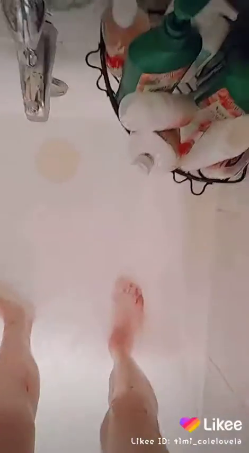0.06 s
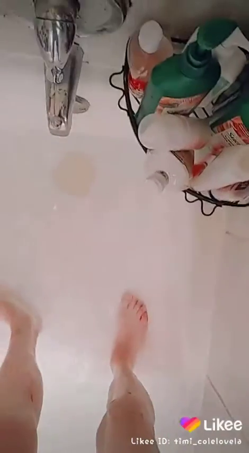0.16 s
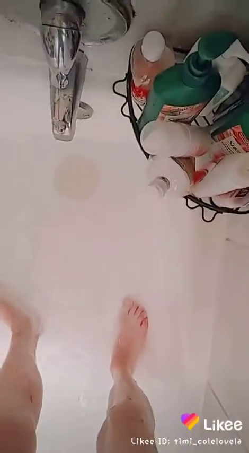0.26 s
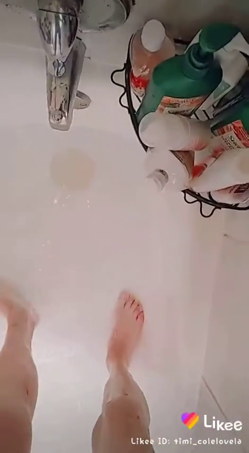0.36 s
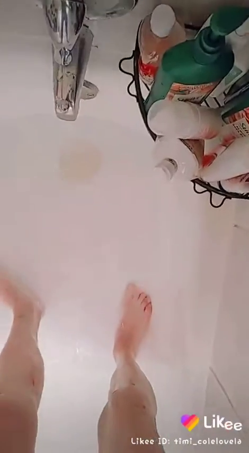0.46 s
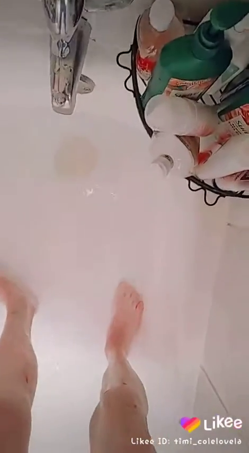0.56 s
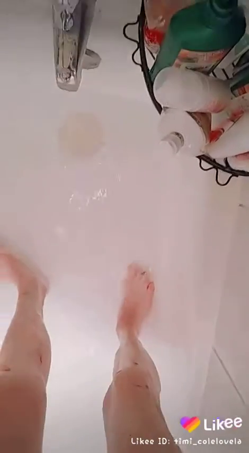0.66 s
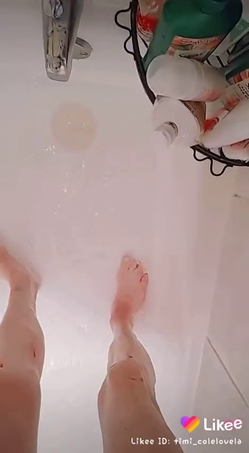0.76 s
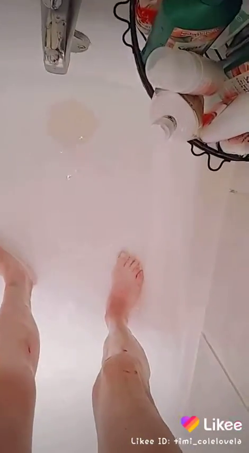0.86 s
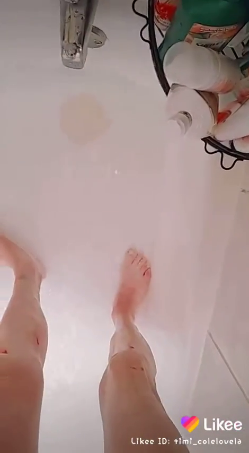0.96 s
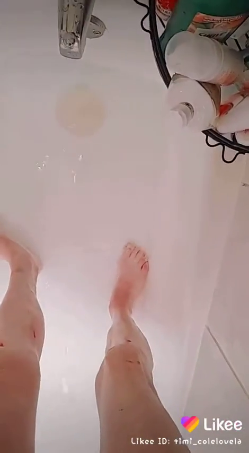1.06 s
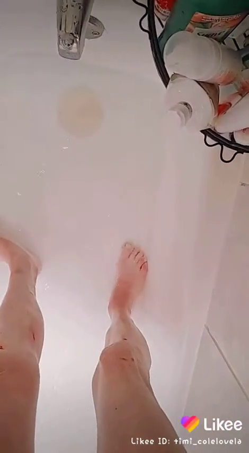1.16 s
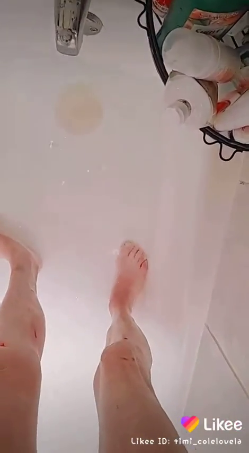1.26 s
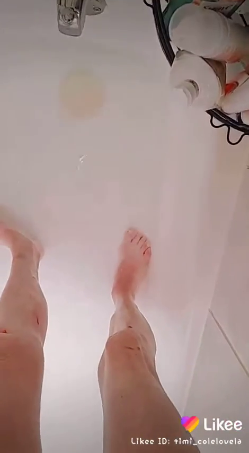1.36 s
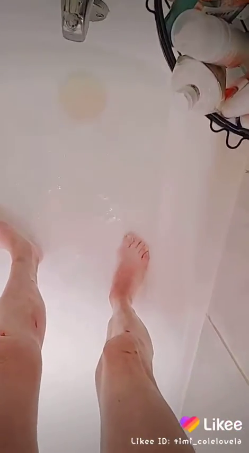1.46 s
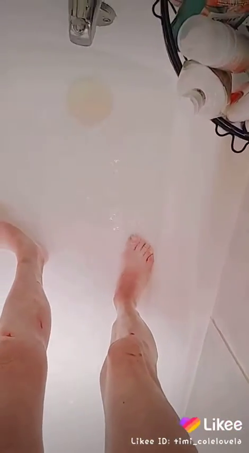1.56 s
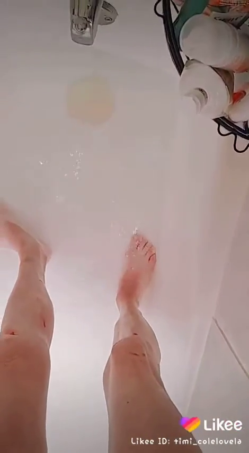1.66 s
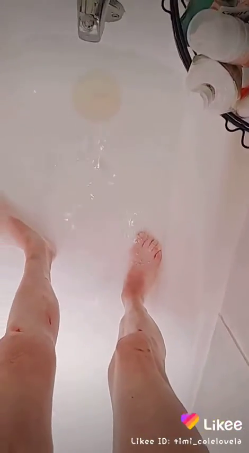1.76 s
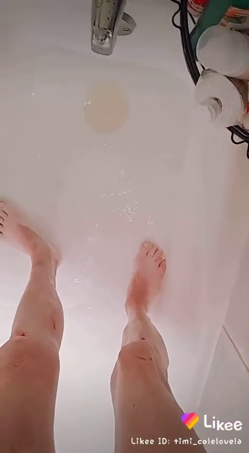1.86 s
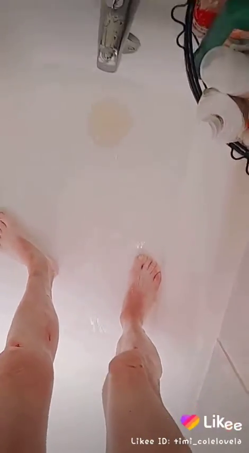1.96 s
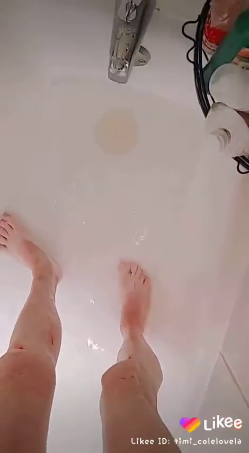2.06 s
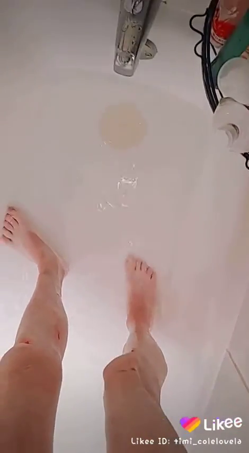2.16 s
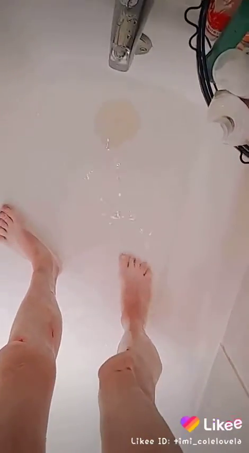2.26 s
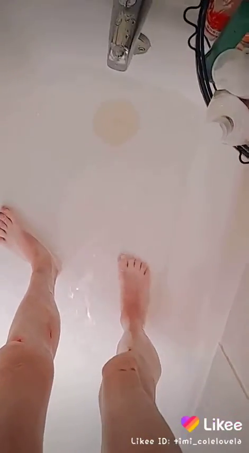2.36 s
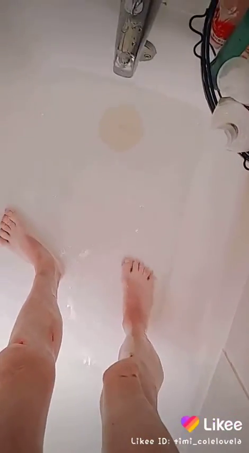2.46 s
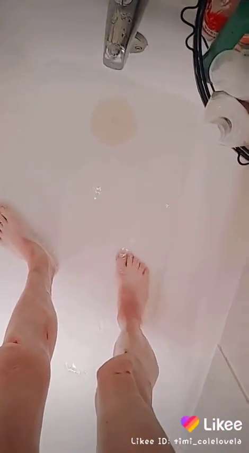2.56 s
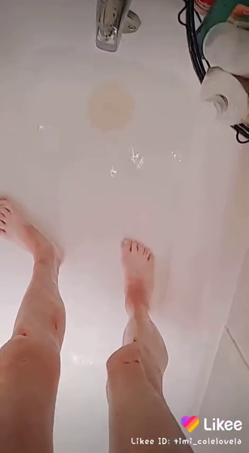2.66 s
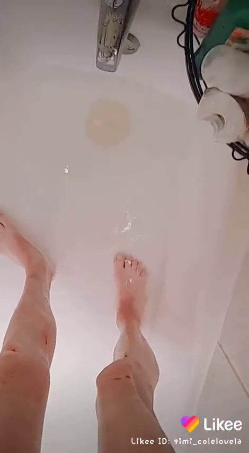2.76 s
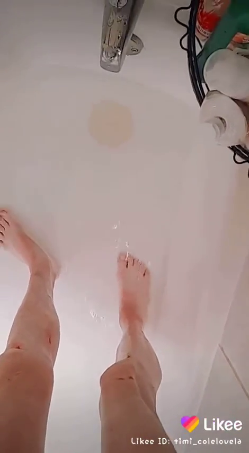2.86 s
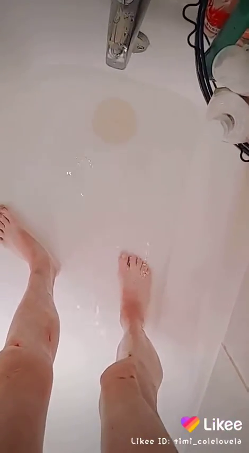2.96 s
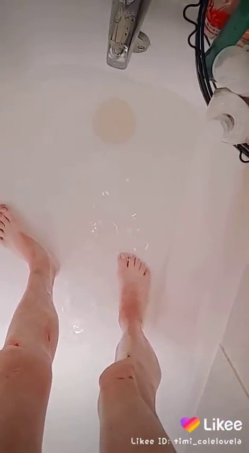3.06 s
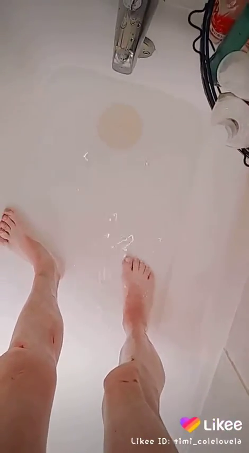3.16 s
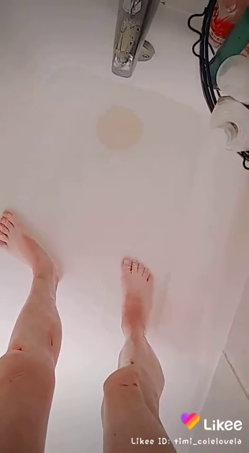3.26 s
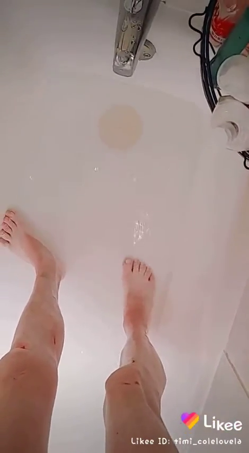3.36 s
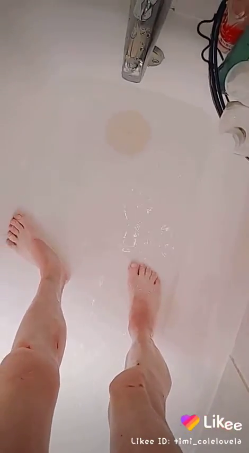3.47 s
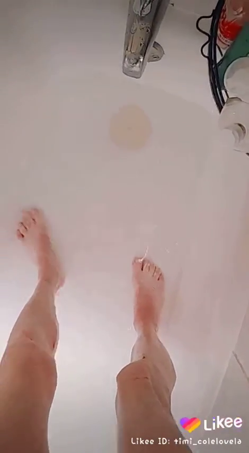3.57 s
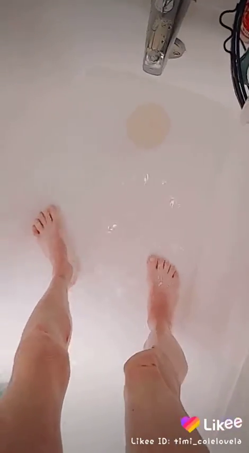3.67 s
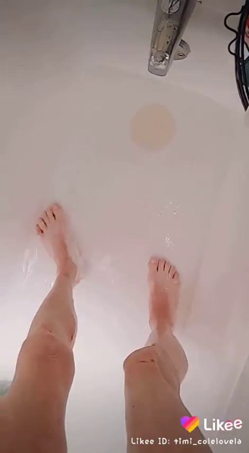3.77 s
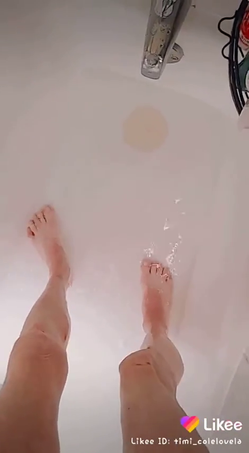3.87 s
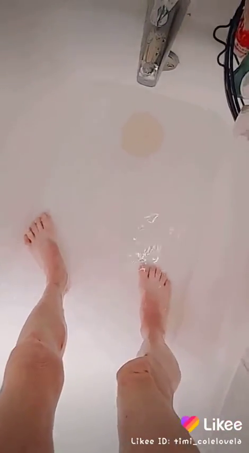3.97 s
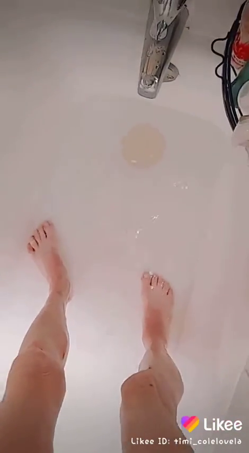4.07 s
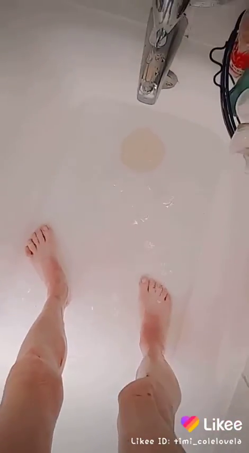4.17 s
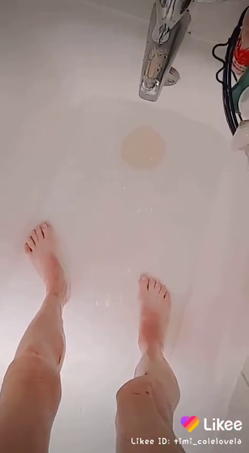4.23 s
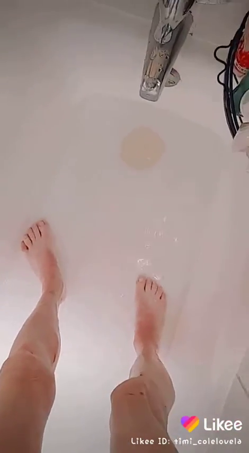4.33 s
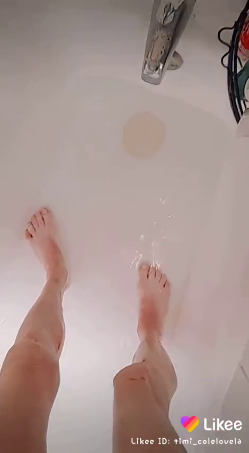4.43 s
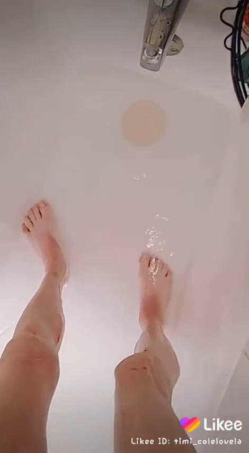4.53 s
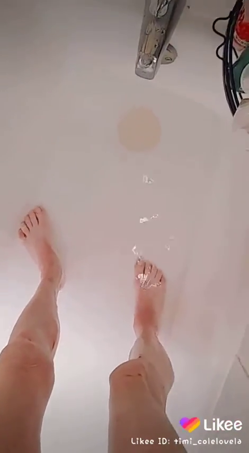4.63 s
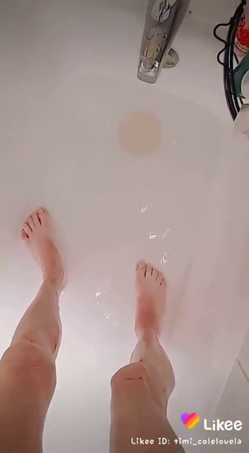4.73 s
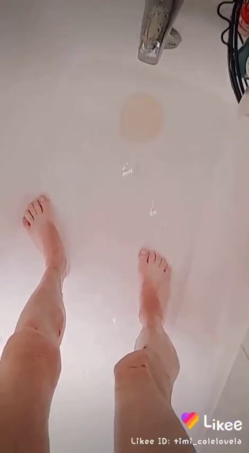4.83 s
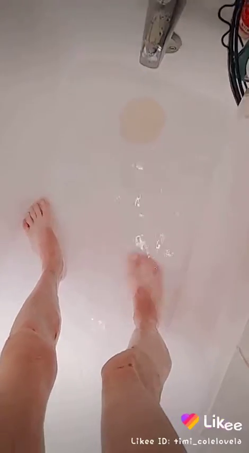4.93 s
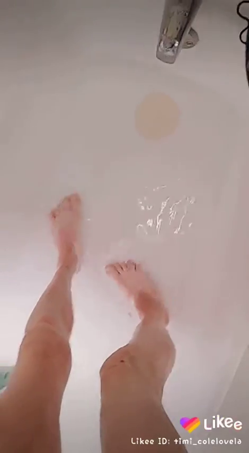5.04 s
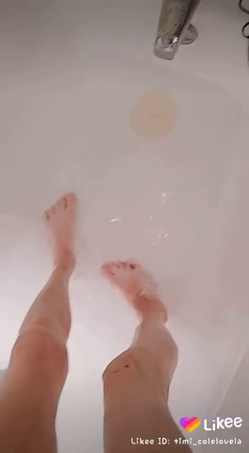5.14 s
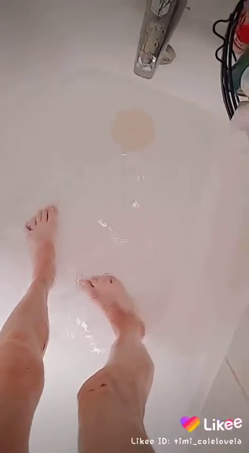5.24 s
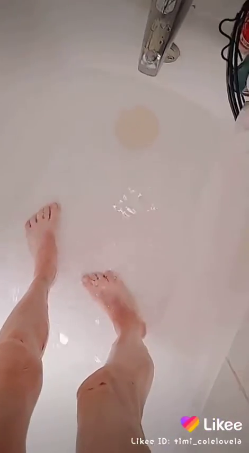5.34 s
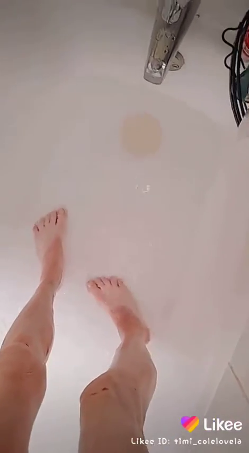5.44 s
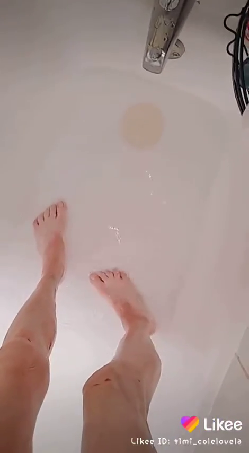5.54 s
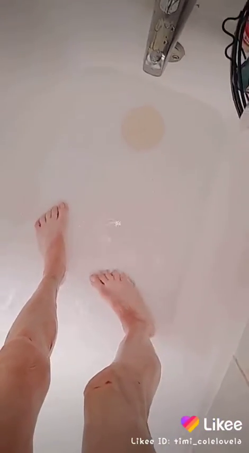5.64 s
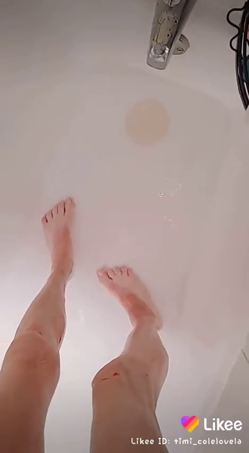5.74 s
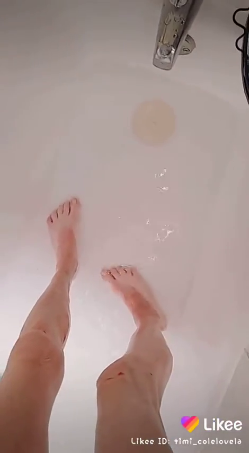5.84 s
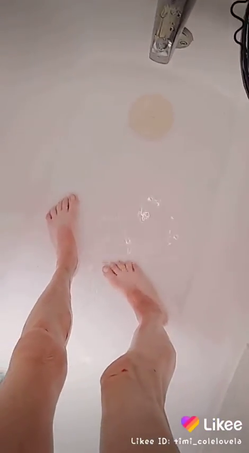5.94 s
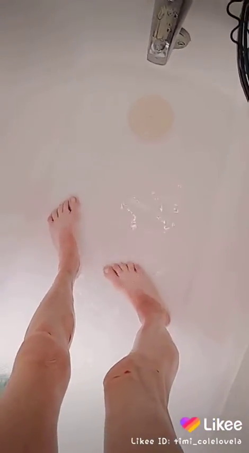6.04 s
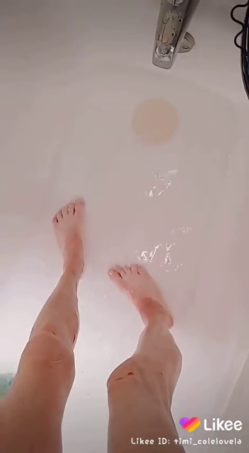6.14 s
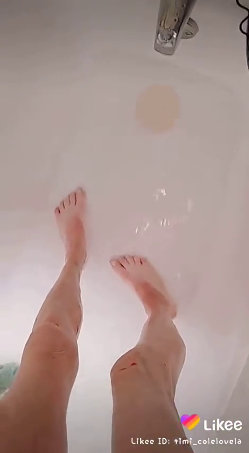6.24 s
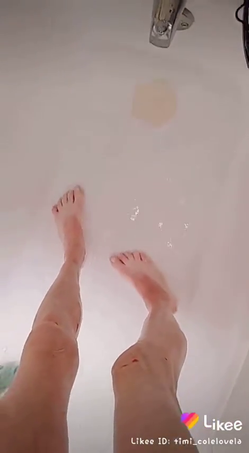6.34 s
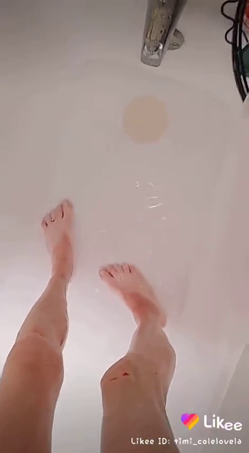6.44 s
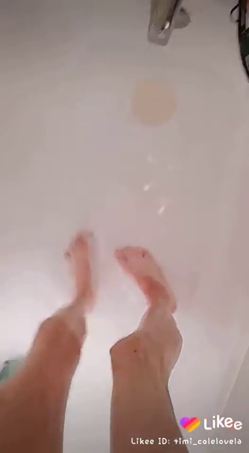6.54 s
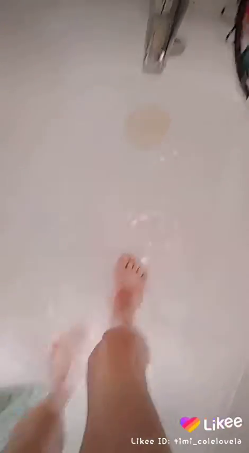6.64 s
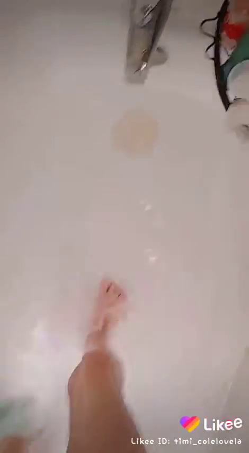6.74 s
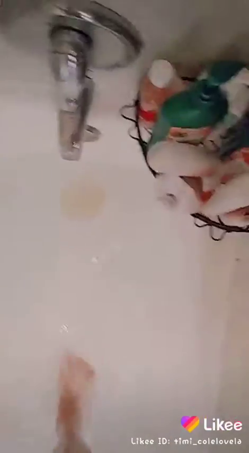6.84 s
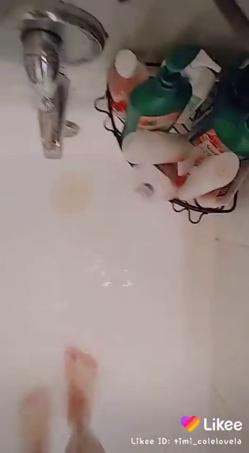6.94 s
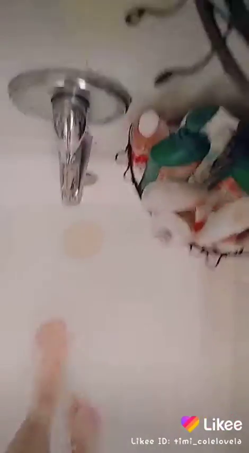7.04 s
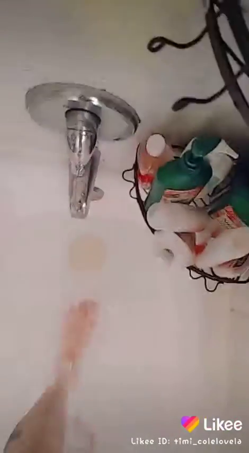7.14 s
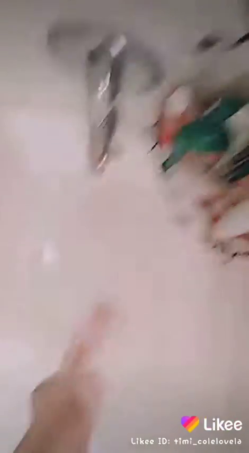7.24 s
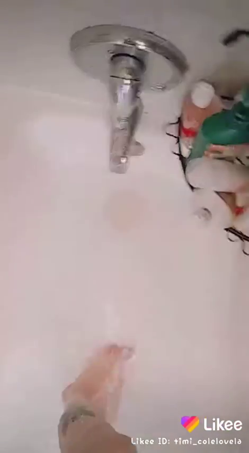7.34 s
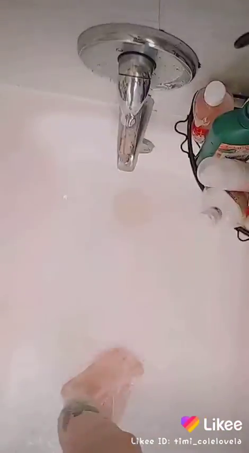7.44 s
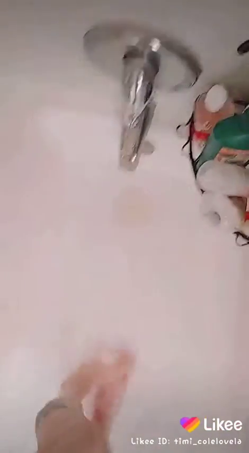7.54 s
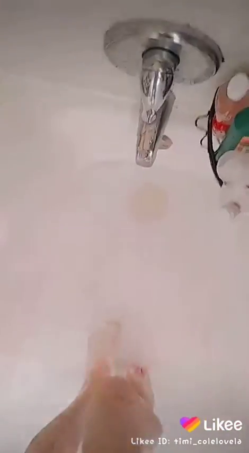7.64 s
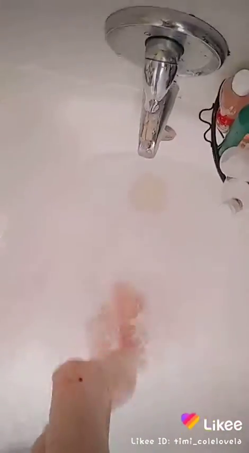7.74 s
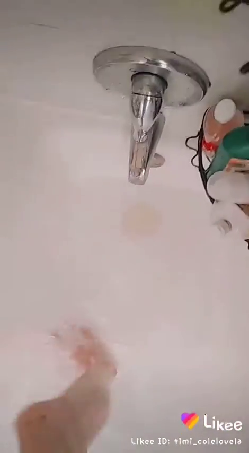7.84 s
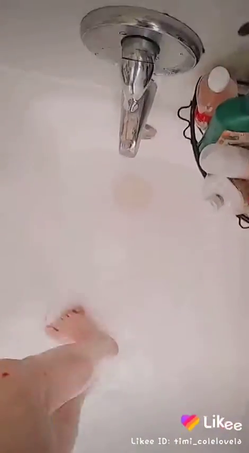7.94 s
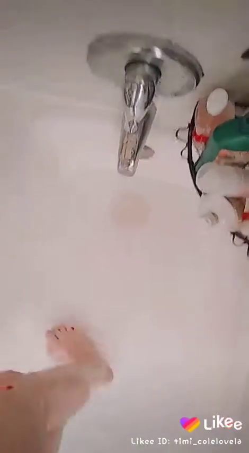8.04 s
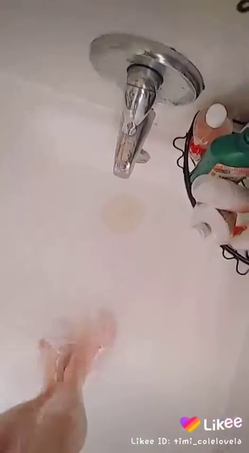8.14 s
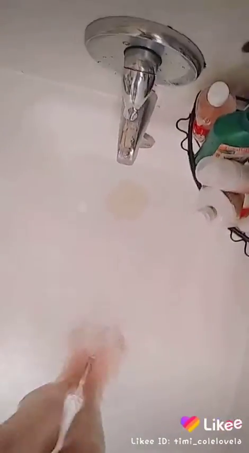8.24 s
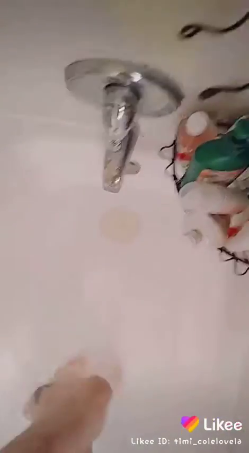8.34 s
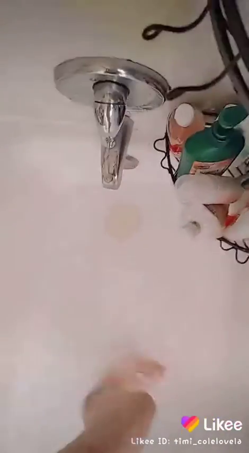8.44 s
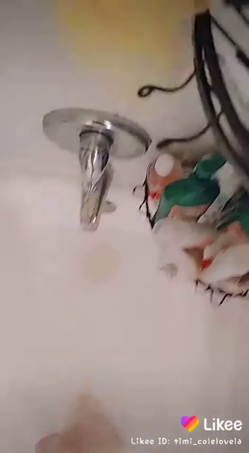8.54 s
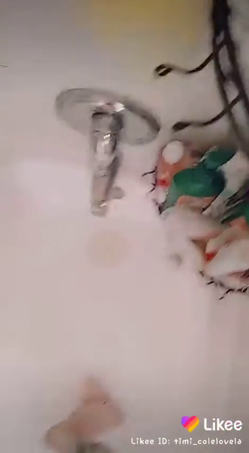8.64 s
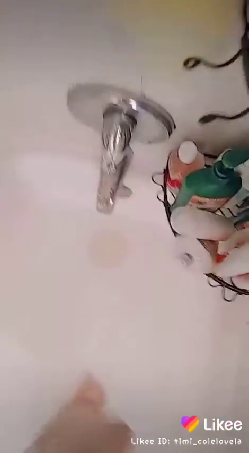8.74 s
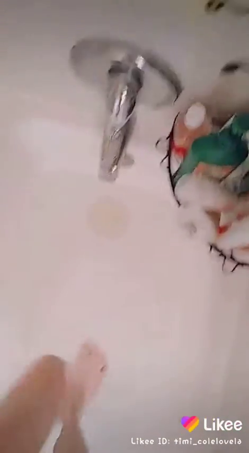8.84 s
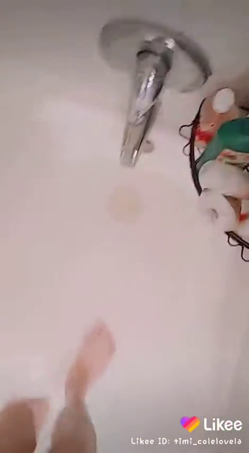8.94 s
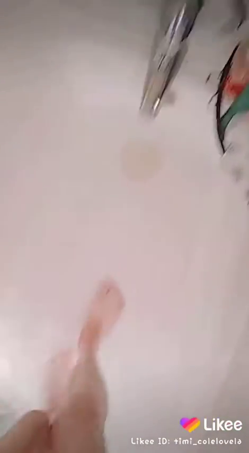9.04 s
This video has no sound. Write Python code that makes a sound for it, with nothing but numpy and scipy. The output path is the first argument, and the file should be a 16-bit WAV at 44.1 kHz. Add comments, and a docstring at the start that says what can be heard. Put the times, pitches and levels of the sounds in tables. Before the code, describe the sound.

A handheld microphone close above a bathtub catches shallow water disturbed by feet. Isolated splashes, bubbly plips and tiny ticks alternate with near silence over a faint room hum. One brisk kick stands out before the last third bursts into fast, loud stamping, with churning water, bright spray and hollow tub booms, short reflections from tiled walls, then a brief lull and a last splash.

```python
"""Bare feet splashing in a bathtub

Bare feet slosh and stamp in the shallow water of a bathtub, in a small tiled bathroom.
Moving water traps clouds of ringing bubbles and throws fizzing spray over a low surge of noise.
Heels make the tub shell boom in its modes; single drips and bubbles ring out in the quiet gaps.
Foam fizzes away, droplets rain back, sparse reflections echo the water, and a faint room tone stays."""
import sys
import numpy as np
from scipy import signal
from scipy.fft import rfft, irfft
from scipy.io import wavfile
from scipy.ndimage import uniform_filter1d

SR = 44100
rng = np.random.default_rng(int(sys.argv[2]) if len(sys.argv) > 2 else 0)


def dump(signal):
    """Clip the signal to [-1, 1] and save it as 16-bit WAV at the path in sys.argv[1]."""
    limited = np.clip(np.atleast_2d(signal).T, -1, 1)
    pcm = np.round(limited * 32767).astype(np.int16)
    wavfile.write(sys.argv[1], SR, pcm)


N = 401310  # length in samples


def gain_of(db):
    """Turns decibels into an amplitude factor."""
    return 10 ** (np.asarray(db) / 20)


def evened(x):
    """Scales a sound to an rms of 1."""
    return x / np.sqrt(np.mean(x ** 2) + 1e-20)


def read(points, hz):
    """Reads a curve drawn through (frequency, value) points, on a logarithmic frequency axis."""
    point_hz, value = np.transpose(points)
    return np.interp(np.log(hz + 1), np.log(point_hz + 1), value)


def add(mix, start_s, sound):
    """Lays a sound into the mix at a given time, cut off at the end of the mix."""
    part = mix[round(start_s * SR):][:len(sound)]
    part += sound[:len(part)]


def coloured(x, spectrum):
    """Flattens the broad spectrum of a sound, then gives it the wanted one, at rms 1."""
    z = rfft(x)
    smooth = np.sqrt(uniform_filter1d(abs(z) ** 2, size=1500))
    wanted = gain_of(read(spectrum, np.fft.rfftfreq(N, 1 / SR)))
    return evened(irfft(z / smooth * wanted, N))


def resonate(x, hz, width_hz):
    """A moving resonance: shifts the pitch curve down to zero, smooths, and shifts back."""
    turn = np.exp(2j * np.pi * np.cumsum(hz) / SR)
    r = np.exp(-np.pi * width_hz / SR)
    smooth = signal.lfilter([1 - r], [1, -r], x / turn)
    return 2 * (turn * smooth).real


def bubble(hz, rise, t60, attack_s):
    """A pocket of air rings as a dying sine whose pitch climbs as it nears the surface."""
    t = np.arange(round(np.clip(t60, .002, .4) * SR) + 8) / SR
    pitch_hz = np.minimum(hz * 2 ** (rise * t), .45 * SR)  # rise is in octaves per second
    turns = np.cumsum(pitch_hz) / SR
    return np.sin(2 * np.pi * turns) * gain_of(-60 * t / t60) * (1 - np.exp(-t / attack_s))


def cloud(low_hz, high_hz, per_s, cycles, spread_db, climb, count=16):
    """Bubbles of many sizes burst at random; each rings for some cycles, a few are large."""
    out = np.zeros(N)
    bursts = rng.random(N) < per_s / SR
    size = gain_of(spread_db * np.minimum(rng.exponential(1, N), 5)) * bursts
    kind = rng.integers(0, count, N)
    for k, hz in enumerate(np.geomspace(low_hz, high_hz, count)):
        t60 = cycles / hz
        ring = bubble(hz, climb / t60, t60, 2.6 / hz)  # climbs by this many octaves within t60
        out += signal.oaconvolve(size * (kind == k), ring)[:N]
    return evened(out)


def room_tone():
    """The quiet bathroom: steady noise with a fixed spectrum."""
    # spectrum of the quiet room: (pitch_hz [Hz], relative_level_db [dB per Hz])
    room_spectrum = [(15, -76), (25, -47), (59, -9), (80, -3.5), (91, -22), (130, 0.5), (144, -36.5),
                     (174, -2.5), (307, -33.5), (371, -19), (587, -27), (729, -20), (2030, -38),
                     (11400, -46), (15800, -59.5)]
    return gain_of(-66) * coloured(rng.standard_normal(N), room_spectrum)


def foam():
    """Foam of an earlier splash: tiny bubbles pop in a bright fizz that dies away."""
    start_db, fall_db_per_s = -52.5, 17.5
    # spectrum of the fizz: (pitch_hz [Hz], relative_level_db [dB per Hz])
    foam_spectrum = [(1470, -30), (2500, -1.5), (3300, -8), (3560, 0.5), (5490, -5.5), (6210, -3),
                     (11500, -5.5), (15800, -19.5)]
    pops = cloud(3200, 15000, 1500, 12, 2.0, 0.3, count=8) + rng.standard_normal(N)
    fizz = coloured(pops, [(1500, -60.5)] + foam_spectrum)  # almost nothing below 1500 Hz
    return gain_of(start_db - fall_db_per_s * np.arange(N) / SR) * fizz


def shower(count=40):
    """Droplets of random size rain back after a kick, each a short plip of rising pitch."""
    low_hz, high_hz, cycles, fall_db = 1090, 6000, 78, 3
    # showers of droplets: (start_s [s], length_s [s], reference_db [dB]);
    # single droplets are set 7 to 24 dB below the reference
    showers = [(0.02, 0.42, -55), (5.06, 0.27, -44.5)]
    out = np.zeros(N)
    for start_s, length_s, reference_db in showers:
        for when, pitch, size, glide in rng.random((count, 4)):
            hz = low_hz * (high_hz / low_hz) ** pitch
            t60 = cycles / hz
            plip = bubble(hz, 0.4 * glide / t60, t60, 1.7 / hz)
            level_db = reference_db - fall_db * when + 14 * (size - 1.5)
            add(out, start_s + when * length_s, gain_of(level_db) * plip)
    return out


def drips():
    """Single bubbles ring as dying sines; landing drops tick as short bursts of resonant noise."""
    # single bubbles: (start_s [s], peak_db [dB], pitch_hz [Hz], rise [octaves per s],
    # t60_s, the time to die by 60 dB [s])
    bubbles = [(0.028, -19, 444.5, 7.3, 0.12), (0.13, -20.5, 812, 0.26, 0.052), (0.2, -52, 790, 0.48, 0.08),
               (0.276, -38.5, 1080, 2.7, 0.0097), (0.311, -43, 910, 0.2, 0.033),
               (0.423, -51, 2903.0, 0.3, 0.024), (0.431, -45, 1805, 0.2, 0.024),
               (0.544, -35, 986, 0.18, 0.065), (0.581, -48, 1930, 3.4, 0.016),
               (0.755, -29.5, 3750, 0.15, 0.049), (0.758, -34, 3970, 0.57, 0.064),
               (0.769, -36.5, 4010, 0.16, 0.08), (0.852, -47.5, 1466, 3.6, 0.084),
               (0.856, -51, 2250, 0.3, 0.04), (0.892, -24.5, 1360, 5.5, 0.0072),
               (0.892, -43, 2150, 0.2, 0.025), (0.894, -26, 1024, 2.1, 0.051),
               (0.992, -55, 490, 0.5, 0.065), (1.02, -57, 1127, 0.3, 0.12), (1.081, -51, 375, 2.1, 0.11),
               (1.116, -52, 378, 1.0, 0.15), (1.158, -57, 392, 0.2, 0.16), (1.186, -46, 1653, 0.3, 0.076),
               (1.197, -45, 1710, 0.3, 0.074), (1.249, -51.5, 1390, 0.27, 0.15),
               (1.282, -48.5, 1333, 0.15, 0.085), (1.318, -60, 1378, 0.23, 0.13),
               (1.513, -50, 1714, 0.62, 0.054), (1.998, -55, 1790, 0.18, 0.13),
               (2.052, -33.5, 427, 3.7, 0.096), (2.076, -45, 1810, 0.2, 0.046),
               (2.084, -32, 1117.0, 1.3, 0.061), (2.118, -31.5, 281, 0.2, 0.081),
               (2.122, -28, 530, 4.9, 0.091), (2.131, -42, 4550, 0.3, 0.027), (2.142, -47, 4870, 0.5, 0.01),
               (2.311, -54.5, 474, 1.8, 0.11), (2.76, -59.5, 289, 1.1, 0.1), (2.83, -65, 330, 1.0, 0.1),
               (2.88, -60, 364, 1.0, 0.08), (3.591, -30, 1010, 0.66, 0.073), (3.609, -23, 396, 0.2, 0.025),
               (3.621, -31, 1004, 1.7, 0.14), (3.699, -33.5, 396, 0.2, 0.14), (3.72, -51, 3770, 0.2, 0.013),
               (3.789, -42, 375, 0.56, 0.028), (3.866, -47.5, 1420, 3, 0.13),
               (3.929, -56, 1214, 0.27, 0.15), (4.025, -42.5, 270, 0.2, 0.03),
               (4.107, -42.5, 1160, 0.4, 0.012), (5.03, -22, 1064, 1.9, 0.15),
               (5.045, -20.5, 475, 0.22, 0.088), (5.067, -26, 1070, 0.23, 0.06),
               (5.075, -23, 494.0, 0.28, 0.075), (5.1, -41, 3820, 0.5, 0.03), (5.167, -37, 4600, 0.2, 0.03),
               (5.179, -34.5, 2050, 0.2, 0.012), (5.181, -28.5, 476, 12.2, 0.13),
               (5.201, -27, 606, 24, 0.049), (5.234, -27.5, 1140, 0.22, 0.025),
               (5.238, -42, 2470, 0.23, 0.037), (5.247, -40, 3630, 2.2, 0.019),
               (5.272, -34, 780, 0.6, 0.042), (5.285, -32.5, 3300, 0.9, 0.0082),
               (5.403, -51, 1690, 0.56, 0.03), (5.418, -35.5, 660, 0.18, 0.099),
               (5.431, -51, 2320, 0.2, 0.026), (5.45, -41, 687, 1.4, 0.092),
               (5.465, -41.0, 6970, 0.23, 0.015), (5.468, -51.0, 3330, 0.5, 0.015),
               (5.482, -42.5, 990, 1.5, 0.049), (5.501, -50, 3200, 1.5, 0.018),
               (5.517, -48, 368, 1.2, 0.041), (5.526, -44, 1140, 2.4, 0.02), (5.981, -47, 900, 1.0, 0.012),
               (6.044, -50, 1700, 1.1, 0.019), (6.045, -47, 2030, 0.2, 0.011),
               (6.045, -42, 4230, 0.9, 0.012), (6.526, -28.5, 514, 0.2, 0.029),
               (6.537, -41.5, 1180, 0.2, 0.07), (6.615, -26, 479.4, 0.22, 0.33),
               (6.984, -22, 571, 0.2, 0.18), (6.993, -12, 1152, 22, 0.044), (7.052, -11, 483, 0.57, 0.12),
               (7.139, -11.5, 745, 6.3, 0.051), (7.211, -10.5, 242, 36, 0.032),
               (7.235, -12, 718, 2.6, 0.036), (7.365, -16, 345, 2.0, 0.034), (7.399, -16, 437, 2.8, 0.062),
               (7.439, -21, 428, 2.4, 0.059), (7.511, -12.5, 703, 1.1, 0.063), (7.55, -13, 930, 0.2, 0.051),
               (7.664, -21, 1518, 0.11, 0.2), (7.818, -13.5, 462, 2.0, 0.042),
               (7.881, -10, 448, 2.0, 0.021), (7.92, -12.5, 430, 1.6, 0.064), (7.97, -6.5, 700, 5.1, 0.068),
               (8.074, -14.5, 973, 1.3, 0.027), (8.26, -24, 676, 1.6, 0.12), (8.317, -14.5, 425, 1.4, 0.1),
               (8.43, -16.5, 474, 2.0, 0.035), (8.522, -24, 710, 0.5, 0.06), (8.535, -25, 480, 1.0, 0.072),
               (8.587, -24, 690, 2.7, 0.078), (8.647, -20, 856, 0.82, 0.099), (8.777, -36, 940, 0.18, 0.12),
               (8.819, -46, 916, 0.21, 0.12), (8.899, -44.5, 880, 6.7, 0.18),
               (8.902, -37, 1610, 0.68, 0.036), (9.092, -10.5, 4400, 0.5, 0.02)]
    # wet ticks of drops landing: (start_s [s], peak_db [dB], centre_hz [Hz])
    ticks = [(0.0243, -23, 3540), (0.8926, -40, 4450), (0.9513, -41, 3380), (2.1306, -61, 4730),
             (2.142, -36, 5000), (2.143, -35, 7900), (2.147, -42, 11500), (3.6247, -49, 2790),
             (3.937, -45, 5000), (4.027, -54, 2960), (4.239, -56, 2730), (5.099, -32, 3670),
             (5.406, -44, 6660), (5.465, -33, 7010), (5.9814, -53, 2890), (6.044, -47, 4160),
             (6.759, -11.5, 2400), (7.113, -10.5, 2600), (8.93, -19.5, 3970), (9.0924, -13, 7000)]
    out = np.zeros(N)
    for start_s, peak_db, hz, rise, t60 in bubbles:
        ring = bubble(hz, rise, t60, 1.4 / hz)
        add(out, start_s, gain_of(peak_db) * ring / abs(ring).max())
    dying = gain_of(-60 * np.arange(400) / SR / 0.005)  # 60 dB in 5 ms
    bursts = rng.standard_normal((len(ticks), 400)) * dying
    for (start_s, peak_db, hz), burst in zip(ticks, bursts):
        tick = resonate(burst, np.full(len(burst), hz), 0.13 * hz)
        add(out, start_s, gain_of(peak_db) * tick / abs(tick).max())
    return out


def shell(push, low_db, upper_db):
    """The tub shell rings in its modes under a force."""
    # shell modes: (pitch_hz [Hz], level_db [dB], t60_s, the time to die by 60 dB [s])
    tub_modes = [(102.6, 1.5, 0.49), (121, -18, 0.21), (170.9, 0.5, 0.51), (218, -4, 0.16),
                 (264, -19, 0.79), (344, -3, .3), (447, -6, 0.17)]
    out = np.zeros(len(push))
    for k, (hz, db, t60) in enumerate(tub_modes):
        r = gain_of(-60 / (t60 * SR))
        w = 2 * np.pi * hz / SR
        ring = signal.lfilter([np.sin(w)], [1, -2 * r * np.cos(w), r * r], push)
        # the third mode is the reference: two low ones below it, the upper ones above
        out += gain_of(db + low_db * (k < 2) + upper_db * (k > 2)) * ring
    return out


def stamps():
    """Heel and sole on the tub floor: a soft blow of a few ms sets the shell ringing."""
    # stamps: (start_s [s], peak_db [dB], low_modes_db [dB], upper_modes_db [dB], press_s [s])
    stamp_list = [(3.644, -18.5, 30, -24, 0.0019), (3.973, -48, -19, -4, 0.0017),
                  (6.763, -3.5, 1, -16, 0.0016), (6.816, -10, 20, -15, 0.0022),
                  (7.676, -23.5, -8.5, -7, 0.0021), (7.885, -17.5, -26, -18, 0.0014),
                  (8.257, -6, -15, -31, 0.001), (8.725, -28, -18, -26, 0.0029)]
    out = np.zeros(N)
    t = np.arange(SR * 3 // 4) / SR
    for start_s, peak_db, low_db, upper_db, press_s in stamp_list:
        blow = np.gradient(np.exp(-(t / press_s - 2.5) ** 2))  # the sole presses and lets go
        ring = shell(blow, low_db, upper_db)
        add(out, start_s, gain_of(peak_db) * ring / abs(ring).max())
    return out


def swell(t, start, rise, hold, fall_db_per_s):
    """Power of one burst: a steep climb of 28 dB, a plateau, then a steady fall in dB."""
    climb_db = 28 * (np.clip((t - start) / rise, 0, 1) - 1)
    sink_db = fall_db_per_s * np.maximum(t - start - rise - hold, 0)
    return (t >= start) * gain_of(2 * (climb_db - sink_db))  # doubled dB: power, not amplitude


def motion():
    """Moving feet set the gains of large bubbles, small bubbles, surge and spray, and the surge pitch."""
    water_fall_db_per_s, spray_fall_db_per_s, churn_surge_hz = 233, 295, 174
    # both feet tramping without pause: (time_s [s], large_bubbles_db [dB], small_bubbles_db [dB],
    # surge_db [dB], spray_db above 5.5 kHz [dB])
    churn = [(6.495, -87, -89, -68, -92), (6.514, -40.5, -51, -68, -89), (6.611, -33, -42, -30, -35.5),
             (6.73, -26.5, -23.5, -33.5, -32.5), (6.84, -20, -26, -18, -32), (6.99, -32, -26.5, -34.5, -28),
             (7.08, -23.5, -23, -35.5, -36.5), (7.19, -26.5, -21.5, -31, -33.5),
             (7.24, -22.5, -17, -37.5, -29), (7.46, -26.5, -30, -47, -27), (7.54, -29, -24.5, -46, -32),
             (7.66, -30.5, -28, -36, -40.5), (7.72, -22.5, -22, -36.5, -33), (7.88, -18.5, -28, -25, -32),
             (7.949, -20, -25, -26.5, -26.5), (8.03, -30.5, -27.5, -44, -34.5),
             (8.08, -32, -26.5, -45, -28), (8.19, -34.5, -27, -52, -34.5), (8.26, -16, -25, -15.5, -35),
             (8.55, -34, -31, -61, -35.5), (8.601, -36.5, -29.5, -78, -29), (8.72, -37, -39, -45, -44),
             (8.87, -70, -72, -58, -49.5), (8.925, -59, -57, -66, -43), (8.947, -75, -51, -52, -28.5),
             (9.09, -33, -40.5, -47, -48.5)]
    # water at rest: large_bubbles_db [dB], small_bubbles_db [dB], surge_db [dB]
    lapping_db = (-77, -86, -72)
    # single sweeps of a foot: (start_s [s], rise_s [s], hold_s [s], large_bubbles_db [dB],
    # small_bubbles_db [dB], surge_db along the tub [dB], surge_pitch_hz [Hz])
    sweeps = [(0.0, 0.0045, 0.048, -39, -43, -46, 256), (0.089, 0.033, 0.043, -56, -45.5, -64, 235),
              (0.185, 0.03, 0.2, -65, -56.5, -64.5, 160.4), (0.95, 0.027, 0.31, -68, -75.5, -67, 175),
              (1.931, .015, .03, -74, -66, -64, 190), (1.97, 0.027, 0.13, -45, -49.5, -49.5, 200),
              (2.054, 0.059, 0.032, -34.5, -49.5, -37.5, 228), (2.264, 0.043, 0.035, -64, -67, -77, 199),
              (2.51, 0.032, 0.024, -58.5, -68, -58, 158.4), (2.69, 0.03, 0.14, -73.5, -80, -64.5, 210),
              (3.573, 0.025, 0.088, -33, -40.5, -39, 121.3), (3.813, 0.022, 0.11, -65, -61.5, -53.5, 133.7),
              (3.99, 0.035, 0.12, -58.5, -59.5, -61, 199), (4.197, 0.034, 0.13, -63.5, -76, -66.5, 170),
              (4.981, 0.043, 0.057, -22, -30.5, -21.5, 226), (5.168, 0.049, .04, -55, -42, -44.5, 212.4),
              (5.402, .012, .11, -59.5, -61, -53.5, 155), (5.652, 0.025, 0.15, -65, -67.5, -60, 190),
              (5.901, 0.052, 0.12, -61.5, -65.5, -57, 171), (6.151, 0.037, 0.075, -65.5, -65.5, -55.5, 204),
              (6.31, 0.02, 0.11, -68, -73.5, -72, 178)]
    # handfuls of spray: (start_s [s], rise_s [s], hold_s [s], spray_db above 5.5 kHz [dB])
    spurts = [(0.0, 0.0033, 0.043, -44.5), (0.745, 0.012, .01, -67), (0.85, 0.039, 0.0085, -59),
              (0.937, 0.0093, 0.0055, -58.5), (2.032, 0.029, 0.044, -78), (2.26, .012, .02, -77),
              (2.515, 0.037, .02, -78), (3.592, 0.042, 0.016, -65), (3.765, 0.058, .05, -73.5),
              (3.92, 0.014, 0.008, -75), (3.987, 0.041, 0.085, -68), (4.197, 0.044, 0.16, -81.5),
              (4.57, .02, 0.012, -89), (4.977, 0.13, .06, -66), (5.132, 0.027, 0.1, -53.5),
              (5.398, .02, .05, -75), (5.443, 0.021, .01, -66), (5.49, 0.037, 0.04, -69.5),
              (5.653, 0.023, 0.13, -75), (5.882, 0.042, .09, -71.5), (6.028, 0.0094, 0.0089, -62),
              (6.148, 0.038, 0.08, -75.5), (6.432, .015, .02, -82)]

    t = np.arange(0, N / SR + .002, .001)
    churn_s, *churn_db = np.transpose(churn)
    # powers add up; rows are large bubbles, small bubbles, surge, spray
    power = np.array([gain_of(2 * np.interp(t, churn_s, db, left=-150)) for db in churn_db])
    power[:3] += gain_of(lapping_db)[:, None] ** 2
    for start, rise, hold, *db, _ in sweeps:
        power[:3] += gain_of(db)[:, None] ** 2 * swell(t, start, rise, hold, water_fall_db_per_s)
    for start, rise, hold, db in spurts:
        power[3] += gain_of(db) ** 2 * swell(t, start, rise, hold, spray_fall_db_per_s)

    # the surge pitch glides from the top of one sweep to the next, then to the tramping
    pitch_points = [(start + rise, hz) for start, rise, *_, hz in sweeps]
    pitch_points.append((churn_s[0], churn_surge_hz))
    now = np.arange(N) / SR
    gains = [np.interp(now, t, gain) for gain in np.sqrt(power)]
    return gains, np.interp(now, *np.transpose(pitch_points))


def slosh():
    """Bubble clouds and the low surge follow the moving water; spray fizzes above."""
    # the three spectra have columns (pitch_hz [Hz], relative_level_db [dB per Hz])
    # large bubbles
    gurgle_spectrum = [(140, -36.5), (230, -7), (308, -3.5), (344, 6), (399, 3.5), (437, 9.5), (591, 5),
                       (702, 7), (786, -3.5), (950, 0.5), (1240, -22.5), (2090, -120)]
    # small bubbles
    babble_spectrum = [(440, -41), (750, -7.5), (818, -5), (886, -7), (1120, -4.5), (1260, -6.5),
                       (1740, -16), (2550, -28.5), (3850, -38), (5000, -56.5), (6500, -83), (11000, -120)]
    # spray
    spray_spectrum = [(880, -16.5), (1500, -1.5), (2080, -9.5), (2740, -3), (3360, -10), (4220, -5),
                      (5730, -12), (7110, -8.5), (9940, -17.5), (11600, -13), (13100, -25), (15200, -34),
                      (15800, -23.5)]

    (large_gain, small_gain, surge_gain, spray_gain), surge_hz = motion()
    noise = rng.standard_normal((5, N))
    large = coloured(cloud(230, 900, 350, 38, 2.2, .5) + .75 * noise[0], gurgle_spectrum)
    small = coloured(cloud(750, 3200, 800, 60, 2.5, .35) + .75 * noise[1], babble_spectrum)
    surge = evened(resonate(resonate(noise[3], surge_hz, 100), surge_hz, 150))

    fine_drops = cloud(1582, 15000, 2500, 43, 0.59, 0.38, count=18)
    fizz = coloured(fine_drops + 3.1 * noise[2], spray_spectrum)
    # separate droplets falling back
    plips = coloured(cloud(1800, 8000, 70, 65, 1.0, 0.28, count=10), spray_spectrum)
    # spray lands in handfuls
    patter = gain_of(2.56 * evened(uniform_filter1d(noise[4], size=900)))
    drops = patter * fizz + 0.46 * plips
    # the spray level counts only what lies above 5.5 kHz
    treble = signal.sosfilt(signal.butter(6, 5500, "high", fs=SR, output="sos"), drops)
    spray = spray_gain * drops / np.std(treble)
    return large_gain * large + small_gain * small + surge_gain * surge + spray


def bathroom(x):
    """Tiled walls: sparse reflections of random sign, each band dying at its own speed."""
    # room decay: (pitch_hz [Hz], t60_s, the time to die by 60 dB [s])
    tile_decay = [(150, 0.38), (500, 0.19), (1500, 0.18), (4000, 0.14), (12000, 0.17)]
    taps = np.zeros(SR // 2)
    slots = np.arange(200, len(taps) - 20, 20)  # one reflection at a random place in each slot
    taps[slots + rng.integers(0, 20, len(slots))] = rng.choice([-1., 1.], len(slots))
    hz, t, z = signal.stft(taps, SR, nperseg=256)
    decay = gain_of(-60 * t / read(tile_decay, hz)[:, None])
    tail = signal.istft(z * decay, SR, nperseg=256)[1]
    return signal.fftconvolve(x, tail / np.linalg.norm(tail))[:N]


def scene():
    """Mixes water, drops and their echo with the stamps and the room tone."""
    water = slosh() + foam()
    drops = drips() + shower()
    echo = bathroom(gain_of(-10) * water + gain_of(-2.5) * drops)
    return (water + drops + echo + stamps() + room_tone())[None]


def record(dry):
    """The microphone drops deep bass and rounds off the loudest peaks; then the band limit."""
    edge_hz = 15850
    thin = signal.lfilter(*signal.butter(3, 70, "high", fs=SR), dry)
    rounded = 0.69 * np.tanh(thin / 0.83)
    low_pass = signal.firwin(511, edge_hz, window=("kaiser", 9), fs=SR)
    return signal.oaconvolve(rounded, low_pass[None], "same")


dry = scene()
out = record(dry)
dump(out)
```